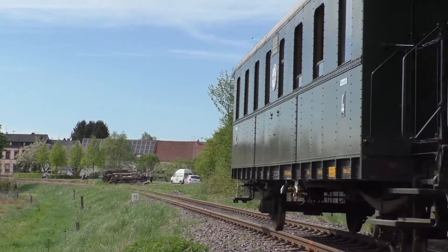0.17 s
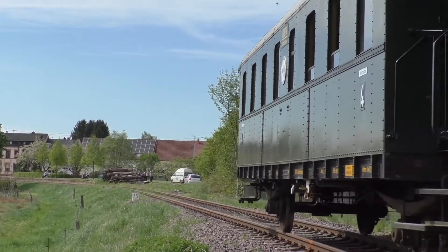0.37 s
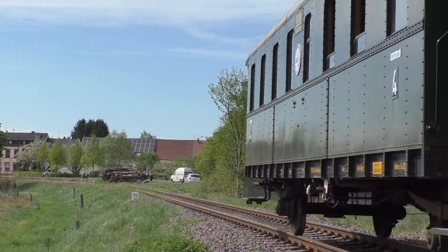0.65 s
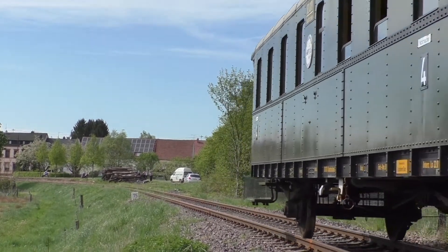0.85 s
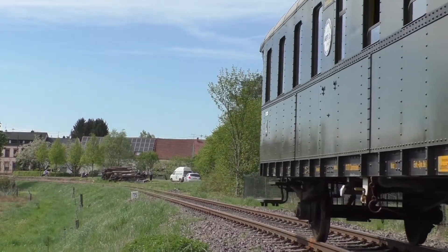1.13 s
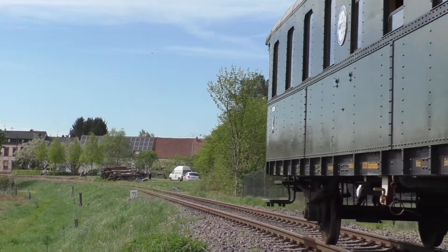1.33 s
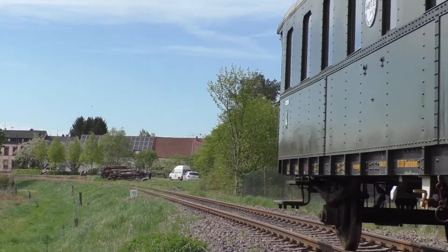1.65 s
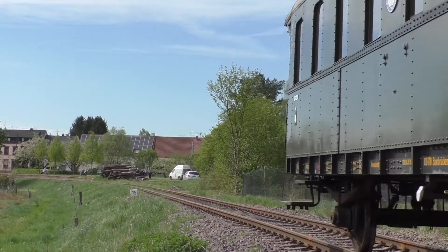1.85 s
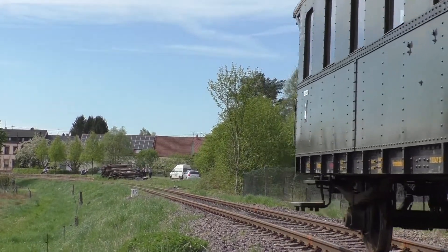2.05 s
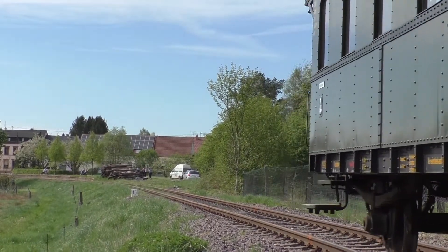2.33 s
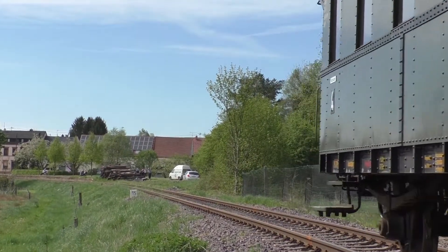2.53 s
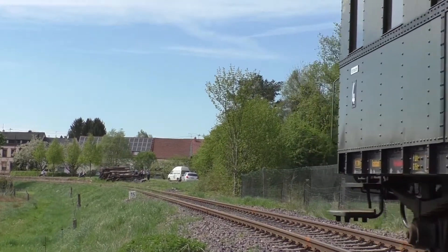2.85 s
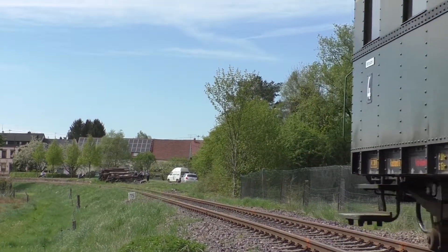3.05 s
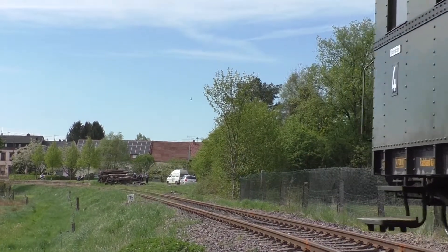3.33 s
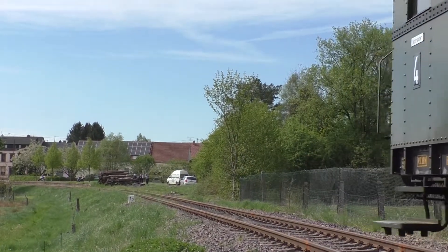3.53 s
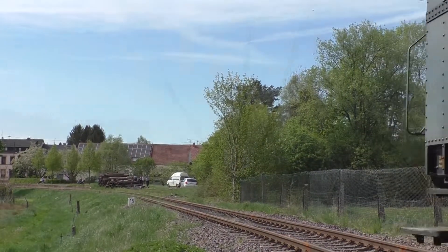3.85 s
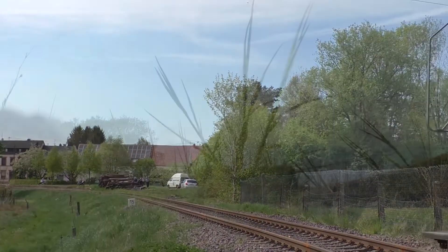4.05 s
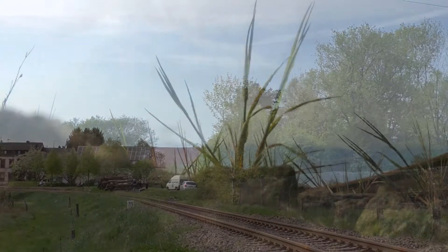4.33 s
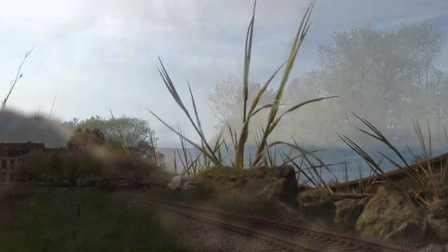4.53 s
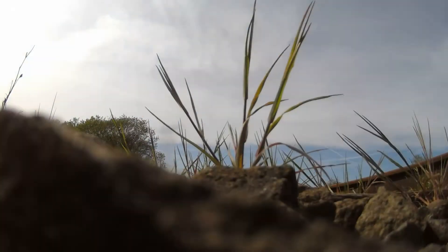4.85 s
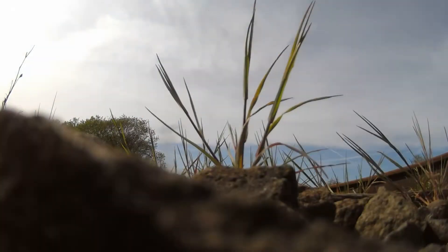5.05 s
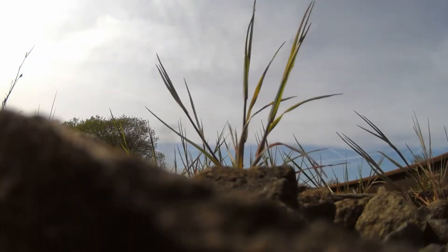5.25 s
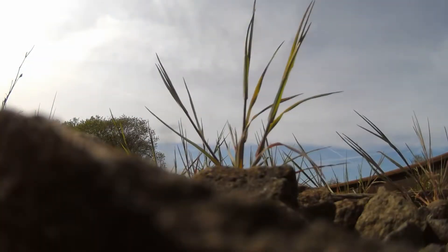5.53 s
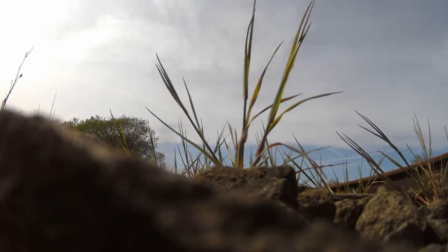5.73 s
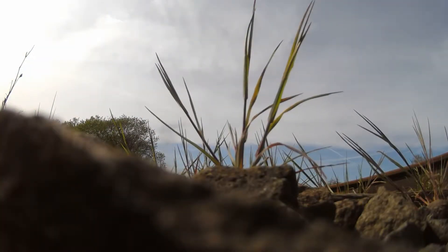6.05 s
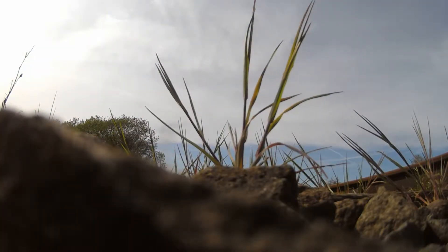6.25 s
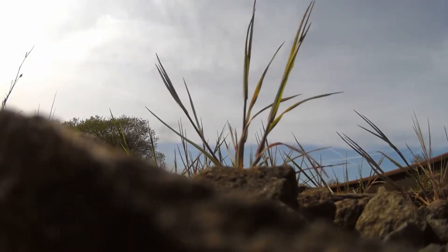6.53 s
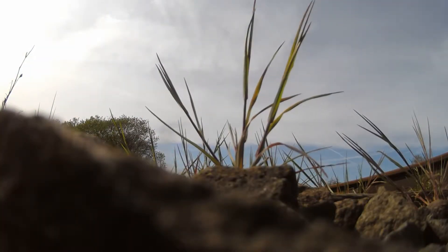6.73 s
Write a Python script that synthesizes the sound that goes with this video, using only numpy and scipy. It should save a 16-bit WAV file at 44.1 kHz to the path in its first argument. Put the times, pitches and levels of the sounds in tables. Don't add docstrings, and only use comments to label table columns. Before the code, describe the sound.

A trackside stereo microphone hears old passenger coaches pass nearby: metallic squealing and hissing first, then fuller rumble, dull thumps and ringing wheels. It dissolves into a quiet mono scene low by the track, with soft wind and faint hum. One smooth, almost pure whistle blast sounds far off, rises quickly near its end, cuts off and leaves a wavering, breathy echo.

```python
import sys
import numpy as np
from scipy import signal
from scipy.fft import rfft, irfft
from scipy.io import wavfile
from scipy.ndimage import uniform_filter1d

SR = 44100
rng = np.random.default_rng(int(sys.argv[2]) if len(sys.argv) > 2 else 0)


def master_out(mix):
    frames = np.transpose(np.atleast_2d(mix))
    ceiling = np.clip(frames, -1, 1)
    pcm = np.round(ceiling * 32767).astype(np.int16)
    wavfile.write(sys.argv[1], SR, pcm)


def to_linear_factor(level_db):
    exponent = np.asarray(level_db, float) / 20
    return 10 ** exponent


N = 303408
T = np.arange(N) / SR
FREE_S = 1.55

# (frequency [Hz], density [dB per Hz])
ROLL_COLOUR = [(12, -57.5), (20, -30), (66, -6.5), (168, -1.5), (216, -6), (326, -7.5), (933, -10.5),
               (1040, -9.5), (2020, -16.5), (2520, -15), (4630, -22), (5470, -31), (9780, -22),
               (14800, -32.5)]
WHEEL_PITCHES = [165, 950, 1700, 2450, 2585, 2953, 4001, 4270, 4640, 4760, 5050, 5930, 6080, 6770, 7490,
                 9600, 14100]
# (width [Hz], level [dB])
WHEEL_MODES = [(60, -30), (54, -33), (60, -33.5), (59.7, -39.5), (40, -46.5), (80.8, -37.5), (30, -45),
               (40.05, -46), (40, -54), (40.1, -54.5), (50, -44.5), (70, -43.5), (121.5, -48), (80, -57),
               (150, -42.5), (400, -51), (250, -47.5)]
# (time [s], level [dB])
NEARNESS = [
    (0.0, -10),
    (0.3, -9),
    (0.55, -6),
    (0.75, -6.5),
    (1.1, -3),
    (1.9, 1),
    (2.7, 0.2),
    (3.2, -0.6),
    (4.0, -0.6),
]
# (time [s], level [dB], length [s])
FLOOR_SURGES = [
    (0.13, 0, .08),
    (0.65, 4, .1),
    (1.83, 2.5, .08),
    (2.25, 2.5, .08),
    (2.55, 5, .03),
    (2.76, 2.5, .07),
    (3.15, 7, .04),
    (3.46, 3, .06),
    (3.9, 4, .08),
]
# (time [s], level [dB], length [s])
AXLE_SWELLS = [
    (1.79, 4, .05),
    (2.4, 5, .15),
    (3.0, 13, .13),
    (3.8, 12, .2),
]
# (frequency [Hz], density [dB per Hz])
FLANGE_COLOUR = [(1500, -9.5), (2500, -6.5), (4040, -13.5), (5620, -15.5), (6850, -13), (8500, -7),
                 (11000, -12.5), (14000, -11.5), (15750, -22), (15800, -86)]
# (time [s], level [dB])
FLANGE_GRIP = [
    (0.0, 0.5),
    (0.2, 2.2),
    (0.33, -2),
    (0.53, 4),
    (0.62, 1),
    (1.05, 0),
    (1.39, 2),
]
SQUEAL_PITCHES = [6861, 6800, 13730, 11290, 7811, 4427, 2420, 3600, 8852, 9309, 10515, 6017, 9652, 11900,
                  5056, 7903]
# (width [Hz], level under the squeal [dB])
SQUEAL_MODES = [(12, -1.5), (13.71, -4), (14, -2.5), (20, -6), (12, -7.5), (24, -2.5), (40, -3.5), (50, -5),
                (13.81, -11.5), (35, -11), (14.28, -18), (40, -23), (18, -20), (60, -21.5), (40, -16.5),
                (20.15, -17)]
# (time [s], pitch [Hz], level [dB], length [s])
FLANGE_BITES = [(.36, 4440, -30, .04), (.74, 4430, -32, .09), (1.0, 4430, -32, .05), (.63, 2430, -29, .04),
                (1.22, 2440, -29, .04), (1.39, 2480, -29, .03), (.14, 2280, -30, .05),
                (1.34, 1760, -28, .04), (1.39, 5060, -33, .07), (1.35, 3620, -31, .06),
                (1.5, 3620, -32, .06), (1.7, 3640, -31, .07)]
# (frequency [Hz], left over right [dB], likeness [0-1], left leads by [rad])
PAIR = [(30, -.2, .5, -.2), (70, .6, .88, -.2), (150, .8, .98, -.3), (300, -.5, .97, -.75),
        (500, -4, .93, -1), (800, -7, .88, -1.25), (1200, -11, .5, -1.2), (1750, -12, .35, 0),
        (2200, -10, .5, .8), (4000, -7, .7, 1), (5500, -1, .72, .6), (6000, 0, 1, 0), (7400, 0, 1, 0),
        (9000, -5, 1, 0), (13000, -5, 1, 0), (15500, 0, 1, 0)]
# (low [Hz], high [Hz], share lost in the squeal [0-1], share lost after [0-1])
TREBLE_DROPOUTS = [(13250, 13600, .0, .12), (14100, 14500, .35, .08), (14500, 15000, .5, .25),
                   (15000, 15400, .55, .85), (15400, 15750, .6, .98)]
# (frequency [Hz], density [dB per Hz])
FIELD_COLOUR = [(15, -17.5), (28, -8), (55, 1), (120, -15), (200, -18.5), (431, -23), (590, -20.5),
                (733, -25), (1280, -27.5), (1590, -39), (5710, -51.5), (8000, -63.5), (8600, -110)]
# (multiple of its pitch, width [Hz], level [dB])
FIELD_HUM = [(1, .5, -14), (2, .5, -22), (7, .3, -23), (8, .3, -27), (9, .3, -24), (10, .3, -16),
             (11, .3, -18), (12, .4, -21), (13, .4, -25), (15, .5, -25), (23.5, 25, -27)]
# (time [s], pitch [Hz])
WHISTLE_PITCH = [
    (5.69, 387),
    (5.78, 375),
    (5.97, 375.5),
    (6.07, 381),
    (6.2, 381),
    (6.25, 396),
    (6.285, 421),
    (6.42, 417),
    (6.465, 370),
]
# (time [s], level [dB], length [s])
FALTERS = [
    (5.7, -.7, .04),
    (5.835, -.5, .03),
    (6.16, -1.1, .08),
    (6.275, 1.2, .015),
    (6.312, -3.5, .014),
    (6.385, -1.2, .015),
]
# (level on the low note [dB], level on the high note [dB])
PARTIALS = [
    (-39, -30.5),
    (-37.5, -27.5),
    (-48, -38.5),
]
# (time [s], level [dB], length [s])
LEANS = [
    [(5.94, 4, .1), (6.275, 3, .03), (6.4, 3, .03)],
    [(5.9, 3.5, .12), (6.27, -4, .03), (6.36, 6, .06)],
    [(6.05, 3, .08), (6.255, 4, .02), (6.33, 7, .025), (6.44, 7, .015)],
]
# (frequency [Hz], density [dB per Hz])
STEAM_COLOUR = [(1000, -27), (1700, -5.5), (2220, -6.5), (2490, -7), (6720, -9), (7670, -22.5), (9000, -70),
                (11700, -107), (19800, -120)]
# (delay [s], level [dB])
ECHOES = [
    (.031, -32),
    (0.065, -26),
    (.1, -33.5),
]
# (multiple, level [dB])
FAR_OVERTONES = [(1.9, -12), (2, -8), (2.91, -2), (3, 1), (4, -7), (4.33, -14), (5, -19), (6, -25)]
# (frequency [Hz], density [dB per Hz])
FLARE_COLOUR = [(500, -26), (900, -6.5), (1500, 10.5), (2300, -3.5), (3200, -5.5), (5000, -35.5)]
# (time [s], change [dB])
GAIN_STEPS = [
    (6.0806, -2.5),
    (6.11, -2.5),
]


def rms_one(x):
    return x / np.sqrt(np.mean(x ** 2) + 1e-20)


def in_time(rows):
    s, *columns = np.transpose(rows)
    return [np.interp(T, s, c) for c in columns]


def at_hz(points, hz):
    f, *columns = np.transpose(points)
    return [np.interp(np.log(hz + 1), np.log(f), c) for c in columns]


def ramp(start_s, length_s):
    return np.clip((T - start_s) / length_s, 0, 1)


def after(start_s):
    return np.maximum(T - start_s, 0)


def opening(start_s, length_s):
    return 20 * np.log10(np.sin(np.pi / 2 * ramp(start_s, length_s)) ** 2 + 1e-5)


def swells(rows):
    return sum(db * np.exp(-((T - s) / length) ** 2) for s, db, length in rows)


def drift(rate):
    r = np.exp(-80 * np.pi * rate / SR)
    slow = signal.lfilter([1], [1, -2 * r, r * r], rng.standard_normal(N // 40 + 2002))[2000:]
    return np.interp(np.arange(N) / 40, np.arange(len(slow)), rms_one(slow))


def coloured(spectrum, channels, ripple_db=0):
    hz = np.fft.rfftfreq(N, 1 / SR)
    ripple = np.interp(hz, np.arange(500) * 45, rng.standard_normal(500))
    shape_db = at_hz(spectrum, hz)[0] + ripple_db * ripple * np.clip(hz / 2500, 0, 1)
    noise = rng.standard_normal((channels, N))
    return rms_one(irfft(rfft(noise) * to_linear_factor(shape_db), N))


def bands(x, edges_hz, patchy_db, rate):
    spectrum, hz = rfft(x), np.log(np.fft.rfftfreq(N, 1 / SR) + 1)
    shares = [np.interp(hz, np.log(edges_hz), row) for row in np.eye(len(edges_hz))]
    return [irfft(spectrum * share, N) * to_linear_factor(patchy_db * drift(rate)) for share in shares]


def resonance(hz, width_hz, flicker_db):
    r = np.exp(-np.pi * width_hz / SR)
    poles = [1, -2 * r * np.cos(2 * np.pi * hz / SR), r * r]
    ringing = signal.lfilter([1, 0, -1], poles, rng.standard_normal((2, N)))
    return rms_one(ringing * to_linear_factor(flicker_db * drift(2.8)))


def sung(hz, width_hz, flicker_db):
    wander = np.sqrt(2 * np.pi * width_hz / SR) * rng.standard_normal(N)
    phase = np.cumsum(2 * np.pi * hz / SR + wander)
    return np.sqrt(2) * to_linear_factor(flicker_db * drift(24.0)) * np.array([np.sin(phase), np.cos(phase)])


def rolling():
    near_db, surge_db = in_time(NEARNESS)[0], swells(FLOOR_SURGES)
    rumble_db = -21.5 + 1.45 * near_db + 0.42 * surge_db
    roll_db = -19.5 + 1.02 * near_db
    hiss_db = -36 + 6.5 * ramp(1.35, 1.63)
    body = coloured(ROLL_COLOUR, channels=2, ripple_db=2.5)
    body = body + sum(to_linear_factor(db + 14.5) * resonance(hz, width, 4.0)
                      for hz, (width, db) in zip(WHEEL_PITCHES, WHEEL_MODES))
    parts = bands(body, np.geomspace(40, 14000, 12), patchy_db=0.43, rate=5.3)
    low, middle, high = sum(parts[:5]), sum(parts[5:10]), sum(parts[10:])
    axle = to_linear_factor(-36 + swells(AXLE_SWELLS)) * ramp(1, 1) * resonance(2570, 85, .8)
    boom_db = -22.5 + 2.3 * near_db + surge_db - 4
    boom = to_linear_factor(boom_db) * resonance(160, 45, 0.6) * to_linear_factor(2.5 * drift(8.1))
    throb = to_linear_factor(1.2 * drift(31.0))
    rumble = throb * to_linear_factor(rumble_db - 0.65) * rms_one(low)
    roll = throb ** 0.333 * to_linear_factor(roll_db + 4.5) * rms_one(middle)
    return rumble + roll + to_linear_factor(hiss_db) * rms_one(high) + axle + boom


def flange():
    let_go_s = 1.377
    grip_db, = in_time(FLANGE_GRIP)
    hiss_db = -20 + grip_db - 18 * ramp(let_go_s, 0.063)
    squeal_db = -28.5 - grip_db + 10.5 * (ramp(.1, 0.21) - 1)
    squeal_db = squeal_db - 95.5 * after(let_go_s)
    touching = np.clip((FREE_S - T) / 0.032, 0, 1)
    hiss = sum(bands(coloured(FLANGE_COLOUR, channels=2, ripple_db=2.0),
                     [3000, 5000, 7590, 10500, 13870], patchy_db=2.0, rate=9.0))
    modes = sum(to_linear_factor(db) * sung(hz, width, 3.6)
                for hz, (width, db) in zip(SQUEAL_PITCHES, SQUEAL_MODES))
    low_db = -26.5 - 17 * ramp(.155, .02) + 2.5 * drift(35.0)
    low_tone = to_linear_factor(low_db + 7.5) * np.clip((.45 - T) / .1, 0, 1) * sung(1782, 4.0, 1.6)
    rubbing = to_linear_factor(hiss_db - 0.5) * hiss * to_linear_factor(.8 * drift(40.0))
    return touching * (rubbing + to_linear_factor(squeal_db) * modes) + low_tone


def bites():
    return sum(to_linear_factor(db) * np.exp(-((T - s) / length) ** 2) * sung(hz, 25, 4)
               for s, hz, db, length in FLANGE_BITES)


def microphone_pair(sources):
    direct, scattered = rfft(sources)
    left_db, alike, lead = at_hz(PAIR, np.fft.rfftfreq(N, 1 / SR))
    alike = np.clip(alike, 0, 1)
    shared = alike * np.exp(1j * lead) * direct
    left = to_linear_factor(left_db) * (shared + np.sqrt(1 - alike ** 2) * scattered)
    return irfft(np.array([left, direct]), N)


def treble_dropouts(x):
    hz = np.fft.rfftfreq(N, 1 / SR)
    spectrum = rfft(x) * (hz < TREBLE_DROPOUTS[-1][1])
    x = irfft(spectrum, N)
    for low, high, early, late in TREBLE_DROPOUTS:
        chance = np.repeat(rng.random(N // 2048 + 1), 2048)[:N]
        off = uniform_filter1d(1. * (chance < np.where(T < FREE_S, early, late)), size=700)
        x = x - off * irfft(spectrum * ((hz >= low) & (hz < high)), N)
    return x


def field():
    hum_hz = 52.1
    hum = sum(to_linear_factor(db) * sung(k * hum_hz, width, 1)[0] for k, width, db in FIELD_HUM)
    air = coloured(FIELD_COLOUR, channels=1)[0] + to_linear_factor(-7 * ramp(5.7, .6)) * hum
    wind, drone, *still = bands(air, [32, 70, 150, 600, 3000], patchy_db=0.5, rate=6.1)
    wind = wind * to_linear_factor(-6.5 * np.clip(T - 5, 0, 2))
    drone = drone * to_linear_factor(-2 + 5.5 * ramp(5.8, 1.0))
    return to_linear_factor(-40.5) * (wind + drone + sum(still))


def whistle():
    open_s, shut_s = 5.59, 6.447
    hz = in_time(WHISTLE_PITCH)[0] - 82 * (1 - ramp(open_s, .065))
    valve_db = opening(open_s + .015, .1) - 850 * after(shut_s)
    overblown = np.clip((hz - 395) / 25, 0, 1)
    bright = np.clip((hz - 386) / 14, 0, 1)
    bell_db = 4.6 * ramp(open_s, 1) * np.exp(-((hz - 399) / 14) ** 2)
    creep_db = 5.2 * np.clip(T - open_s, 0, .42)
    tone_db = -7.0 + valve_db + creep_db + bell_db - 1.5 * overblown + swells(FALTERS)
    partials_db = [low + (high - low) * bright + swells(leans) + 1.6 * valve_db
                   for (low, high), leans in zip(PARTIALS, LEANS)]
    phase = 2 * np.pi * np.cumsum(hz * (1 + .001 * drift(30.0))) / SR
    tone = np.sqrt(2) * to_linear_factor(tone_db + (.1 + .7 * overblown) * drift(45.0)) * np.sin(phase)
    overtones = sum(np.sqrt(2) * to_linear_factor(db + (1.9 + 1.1 * overblown) * drift(28.0))
                    * np.sin((k + 2) * phase + 0.27 * drift(27.0))
                    for k, db in enumerate(partials_db))
    lingering = to_linear_factor(-62.5) * (1 + 2.5 * np.exp(-after(shut_s) / .05)) * ramp(shut_s - .05, .05)
    steam_level = to_linear_factor(-45.5 + 4 * bright + 1.15 * valve_db) + lingering
    steam = steam_level * coloured(STEAM_COLOUR, channels=1)[0]
    direct = tone + overtones + (T > open_s) * steam
    return direct + sum(to_linear_factor(db) * np.roll(direct, round(lag * SR)) for lag, db in ECHOES)


def far_echo():
    start_s, high_hz, low_hz = 6.28, 419, 384
    end_db = -95 * after(6.8)
    tone_db = -36 + opening(start_s, .12) + 5 * ramp(6.56, .04) + end_db
    flare_db = opening(start_s, .09) - 16 * ramp(6.49, .14) + .8 * end_db
    phase = 2 * np.pi * high_hz * T
    tone = to_linear_factor(1.5 * drift(22.0)) * np.sin(phase + .3 * drift(22.0))
    low = to_linear_factor(-10 + 2.5 * drift(15.0)) * np.sin(2 * np.pi * low_hz * T + .5 * drift(15.0))
    overtones = sum(to_linear_factor(db + 2.6 * drift(35.0)) * np.sin(.992 * k * phase + 1.1 * drift(35.0))
                    for k, db in FAR_OVERTONES)
    breath = to_linear_factor(-54 + 1.6 * flare_db + 11.5) * coloured(FLARE_COLOUR, channels=1)[0]
    return np.sqrt(2) * (to_linear_factor(tone_db) * (tone + low) + to_linear_factor(-33 + flare_db) * overtones) + breath


def scene():
    fade_s = 3.942
    fade = to_linear_factor(1.19) * np.abs(np.cos(np.pi / 2 * ramp(fade_s, .93))) ** 1.96
    bass_cut = signal.butter(2, 60, "high", fs=SR, output="sos")
    coaches = signal.sosfilt(bass_cut, microphone_pair(rolling() + flange() + bites()))
    limited = 1.306 * np.tanh(coaches / 1.295)
    gain = to_linear_factor(sum(db * ramp(s, .0006) for s, db in GAIN_STEPS))
    quiet_spot = gain * (whistle() + far_echo() + field())
    return fade * treble_dropouts(limited) + ramp(fade_s, 0.78) * quiet_spot


def roll_off(x):
    return signal.sosfilt(signal.butter(12, 16190, fs=SR, output="sos"), x)


def record(dry):
    return roll_off(dry)


dry = scene()
out = record(dry)
master_out(out)
```